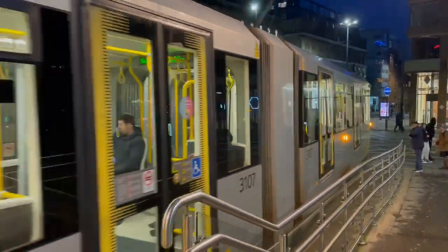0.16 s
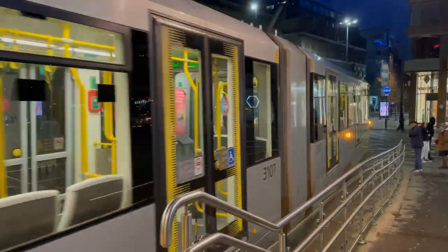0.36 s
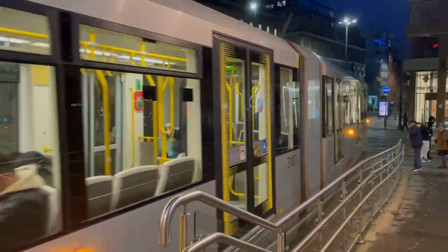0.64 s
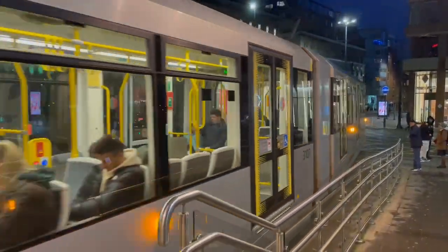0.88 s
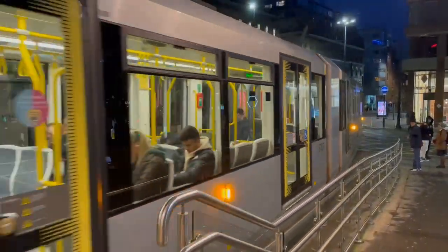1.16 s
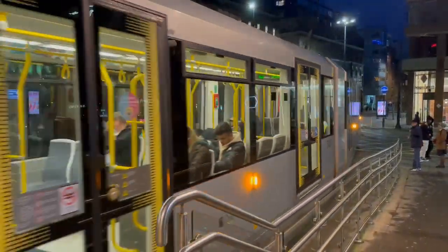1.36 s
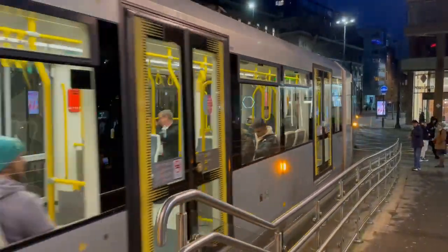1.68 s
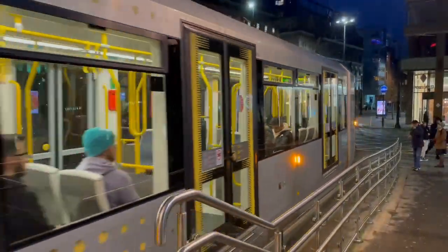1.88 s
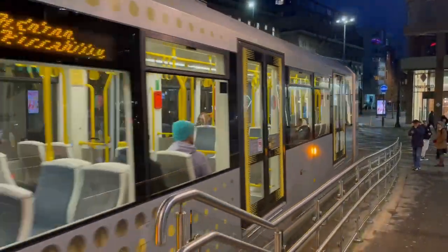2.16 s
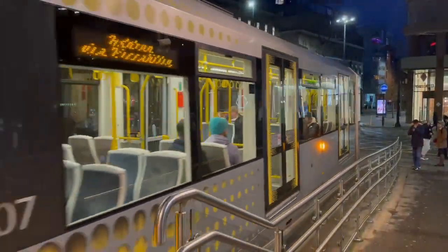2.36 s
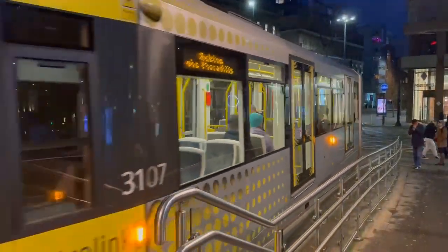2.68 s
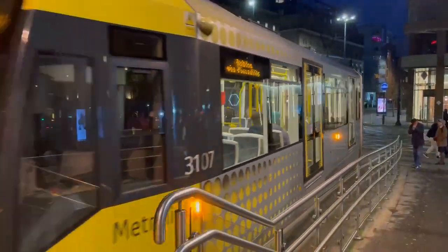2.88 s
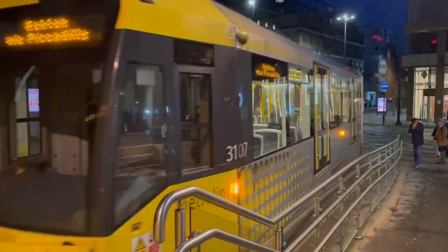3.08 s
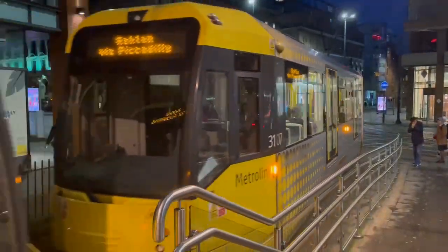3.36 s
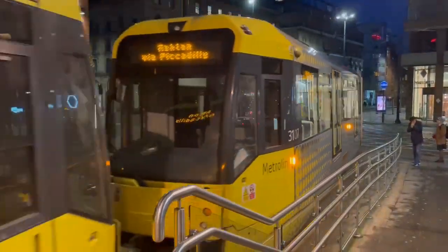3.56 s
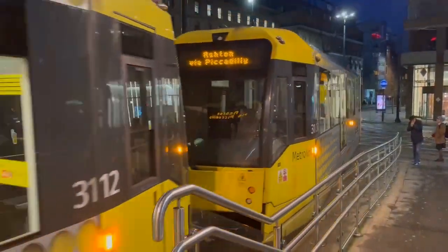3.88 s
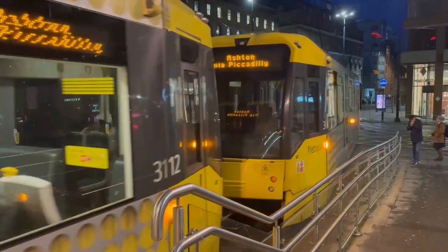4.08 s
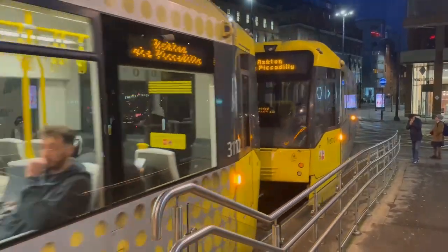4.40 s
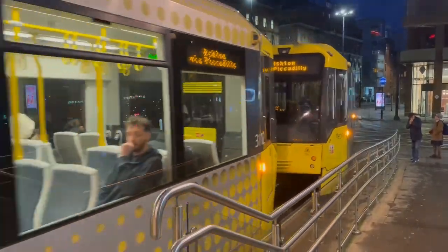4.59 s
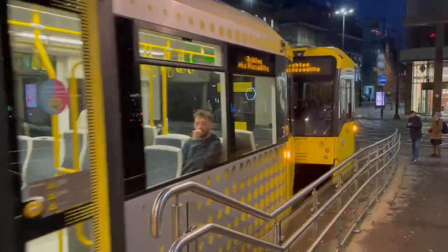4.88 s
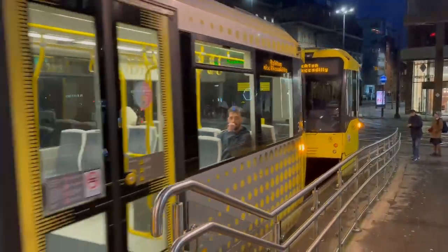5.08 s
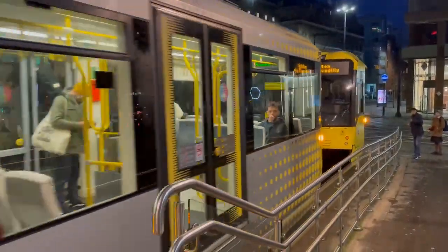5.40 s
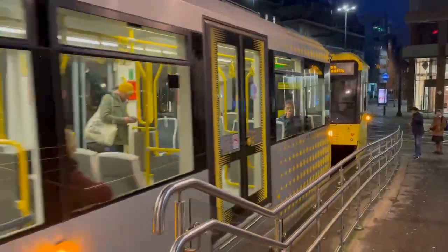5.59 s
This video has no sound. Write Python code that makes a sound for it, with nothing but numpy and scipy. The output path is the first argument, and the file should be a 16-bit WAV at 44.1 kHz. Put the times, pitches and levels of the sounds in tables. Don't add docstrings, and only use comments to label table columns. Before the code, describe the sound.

Close stereo phone capture beside a tram track at a city stop. A deep, uneven boom near seventy hertz dominates throughout, with a dull rolling roar on top. A faint gear whine fades during the first three seconds. Small metallic ticks and rattles come and go, then from about 4.3 seconds loose steel chatters densely, with short scrapes and high squeaks until the end. No voices.

```python
import sys
import numpy as np
from scipy import signal
from scipy.fft import rfft, irfft
from scipy.io import wavfile
from scipy.ndimage import uniform_filter1d, map_coordinates

SR = 44100
rng = np.random.default_rng(int(sys.argv[2]) if len(sys.argv) > 2 else 0)


def attenuation_scalar(level_db):
    decades = np.asarray(level_db, float) / 20
    return 10 ** decades


def wrap_up_sound(samples):
    columns = np.atleast_2d(samples).T
    tamed = np.clip(columns, -1, 1)
    steps = np.round(tamed * 32767).astype(np.int16)
    wavfile.write(sys.argv[1], SR, steps)


N = 253134
TIME = np.arange(N) / SR
HZ = np.maximum(np.arange(N // 2 + 1) * SR / N, 1)

# time_s, pitch_hz, level_db
BOOM = [(0, 63.88, -15.5), (.4, 67.84, -18), (.6, 77.12, -19.5), (.72, 69, -20.5), (.98, 76.09, -21),
        (1.12, 73.02, -11.5), (1.44, 63.95, -12), (1.9, 67.09, -13), (2.4, 66.86, -17.5),
        (2.5, 70.91, -15.5), (3.0, 70.68, -16.5), (3.7, 72.1, -14.5), (3.9, 74.78, -20.5), (4.3, 76.02, -9),
        (4.45, 72, -10), (4.76, 65.98, -16.5), (5.1, 70.77, -25.5), (5.74, 72.4, -13.5)]
# time_s, depth_db, half_length_s
LULLS = [(0.21, 11.5, 0.13), (0.516, 12, 0.046), (0.856, 3, 0.041), (1.045, 12, 0.041),
         (1.284, 11.5, 0.073), (1.71, 7, 0.069), (2.213, 17.5, 0.071), (3.1, 9.5, 0.13),
         (3.366, 15.5, 0.079), (3.611, 27, 0.067), (4.17, 3, 0.08), (4.371, 13, 0.068), (4.68, 4, 0.045),
         (5.067, 5, 0.076), (5.672, 12, 0.061)]


def boom_level_db():
    load_db = curves(BOOM)[1]
    return load_db - sum(depth_db * hump(s, half_s, half_s) for s, depth_db, half_s in LULLS)


def boom():
    hz = curves(BOOM)[0]
    swing = tone(hz, 2.476, 14) * attenuation_scalar(walk(18))
    rumble = attenuation_scalar(-10.5) * narrow(68.8, 18.4)
    return unit(swing + rumble) * attenuation_scalar(boom_level_db())


# time_s, gain_db
NEAR = [(0, 0), (1.0, 0.5), (1.45, 2), (1.7, 0.5), (2, 1), (2.3, -0.5), (3.4, 1), (4.05, -1), (4.3, 2),
        (4.6, 4), (4.85, 3.5), (5.05, 2), (5.3, 3.5), (5.6, 4.5), (5.74, 6)]


def near_db(per_db):
    return per_db * curves(NEAR)[0]


# pitch_hz, density_db_per_hz
ROLL_COLOUR = [(20, -38), (32, -34), (45, -14), (70, -9), (105, -14), (143, -21), (172, -23), (215, -23),
               (320, -29), (500, -31.5), (820, -28.5), (1190, -40), (1600, -41.5), (2400, -46),
               (3500, -49.5), (6500, -60.5)]
# pitch_hz, level_db
HISS_TOP = [(6500, 0), (7600, 2.5), (9000, -1), (11000, -7.5), (12500, -12.5), (13600, -13), (14200, -27),
            (15800, -38)]
# time_s, body_swell_db, rail_swell_db
BUMPS = [(0, 5.5, 0), (1.4, 1.5, 1.5), (1.65, 5.5, 1.5), (1.92, 3, 1.5), (2.41, 5.5, 2), (2.77, 2.5, -0.5),
         (4.24, 3, 3), (4.76, 3.5, 0.5), (5.04, 4, -1.5), (5.21, 5, 2), (5.28, -7, 0.5), (5.47, -5, 3),
         (5.74, 1.5, 7.5)]
BUMP_RISE_S, BUMP_FALL_S = 0.043, 0.1
BODY_PER_DB, RAIL_PER_DB, HISS_PER_DB = 0.85, 0.51, 0.92


def rolling():
    times, body_swells, rail_swells = np.transpose(BUMPS)
    bumps = [hump(s, BUMP_RISE_S, BUMP_FALL_S) for s in times]
    thud_db = 0.59 * uniform_filter1d(boom_level_db() + 17.5, int(.3 * SR))
    body_db = near_db(BODY_PER_DB) + np.dot(body_swells, bumps) - 2.05
    rail_db = near_db(RAIL_PER_DB) + np.dot(rail_swells, bumps) - 2.5
    hiss_db = near_db(HISS_PER_DB) - 0.9
    colour = ROLL_COLOUR + [(f, ROLL_COLOUR[-1][1] + d) for f, d in HISS_TOP[1:]]
    noise = rfft(rng.standard_normal((2, N))) * attenuation_scalar(over_hz(colour))
    shared_flutter = walk(12)
    octave = np.log2(HZ)
    roar = np.zeros((2, N))
    for centre in np.arange(4.5, 14.6, .5):
        band = np.cos(np.pi / 2 * np.clip((octave - centre) * 2, -1, 1)) ** 2
        if centre < 6.3:
            swell_db = thud_db
        elif centre < 8.3:
            swell_db = body_db
        elif centre < 10.4:
            swell_db = rail_db
        else:
            swell_db = hiss_db
        flutter_db = .9 * walk(9) + np.clip((centre - 8) / 4, 0, 1) * 1.2 * shared_flutter
        roar += irfft(noise * band, N) * attenuation_scalar(swell_db + flutter_db)
    return unit(roar) * attenuation_scalar(-22)


# pitch_hz, width_hz, port_lag_rad, [start_s, end_s, level_db]
SLAB_RINGS = [(102.6, 7.78, 0.16, [(2.5, 3.2, -34), (3.35, 3.47, -37), (3.58, 3.85, -37), (4.1, 4.4, -28),
              (4.75, 5.4, -34)]), (140.2, 9.78, 0.14, [(1.1, 1.35, -31.5), (1.42, 1.58, -29.5),
              (1.6, 1.72, -31.5), (1.8, 1.97, -30), (2.36, 2.66, -28), (2.7, 3.1, -33), (3.93, 4.08, -28.5),
              (4.14, 4.26, -28.5), (4.3, 4.6, -31.5), (5.1, 5.5, -28)]),
              (210.2, 10.72, 0.0064, [(0, .45, -36.5), (1.58, 1.72, -38.5), (3.98, 4.14, -35.5),
              (4.3, 4.4, -35), (4.55, 4.9, -39), (5.35, 5.5, -35), (5.52, 5.9, -27)]),
              (264.4, 9.3, 0.83, [(.82, 1.32, -35.5), (1.38, 1.5, -36), (1.75, 2.05, -41.5),
              (2.8, 3.05, -38.5), (3.44, 3.56, -39), (4.24, 4.36, -32.5)]), (354, 32.2, 0, [(.12, .24, -41),
              (2.85, 3.1, -41.5), (3.47, 3.62, -40.5), (4.4, 4.7, -46)]),
              (304.5, 14, 0.34, [(4.2, 4.37, -39.5), (5.23, 5.33, -43), (5.38, 5.45, -47)]),
              (350, 160, 0, [(5.62, 5.95, -44)])]
WHEEL_RINGS = [(470, 11.2, 2.3, [(3.9, 4.3, -41)]), (504, 17.1, 0.34, [(.12, .32, -45), (.72, .9, -45),
               (1.42, 1.55, -47), (2.42, 2.58, -44), (2.8, 3.05, -45), (4.17, 4.26, -43), (4.3, 4.4, -40.5),
               (4.43, 4.53, -39), (5.09, 5.19, -34.5), (5.22, 5.31, -29), (5.4, 5.45, -39),
               (5.64, 5.69, -34.5)]), (588, 5.6, 1.5, [(3.96, 4.1, -44), (4.14, 4.46, -35.5),
               (4.49, 4.74, -35), (4.74, 4.95, -35.5), (4.99, 5.1, -35.5)]),
               (537, 23, .3, [(3.23, 3.3, -45), (3.48, 3.55, -41)]), (774, 25, .2, [(2.1, 2.25, -48),
               (3.5, 3.57, -43), (3.77, 3.84, -39.5), (5.19, 5.26, -41)]), (703, 24.4, 0.41, [(0, .25, -49),
               (.3, .62, -45), (1.2, 1.35, -42.5), (1.38, 1.55, -43)]), (825, 30.1, .1, [(-.05, .1, -35),
               (.17, .45, -40.5), (.52, .7, -40.5), (1.38, 1.55, -42), (2.33, 2.5, -37.5),
               (3.62, 3.76, -42), (4.12, 4.25, -46), (4.44, 4.52, -39), (5.26, 5.34, -43),
               (5.36, 5.52, -37.5), (5.63, 5.9, -34.5)])]
RIM_RINGS = [(937, 41, .3, [(1.55, 2.05, -45), (2.5, 3.5, -47)]), (1390, 690, 0.45, [(5.62, 5.95, -34)]),
             (1600, 34.4, .8, [(.45, .8, -53), (.95, 1.1, -50), (1.2, 1.5, -52), (1.53, 1.62, -46),
             (1.74, 2.0, -50), (2.1, 2.28, -49), (2.4, 2.56, -51), (2.7, 2.85, -54)]),
             (1857, 30, 0, [(2.58, 2.66, -51), (4.28, 4.33, -48), (4.62, 4.85, -46)]),
             (2326, 45.5, 0, [(-.3, 2.8, -56), (.08, .18, -49), (.24, .4, -54), (.58, .66, -53),
             (.71, .83, -50), (.92, 1, -48.5), (1.15, 1.61, -52.5), (1.72, 1.86, -50), (1.89, 2.05, -56),
             (2.55, 2.7, -54), (2.85, 3.05, -49)]), (2490, 43.7, 0, [(.58, .68, -50), (.71, .82, -48),
             (.92, 1.02, -49), (1.26, 1.5, -54), (1.72, 2.05, -54)]), (2480, 44.7, 0, [(2.0, 2.08, -53),
             (2.24, 2.32, -51), (2.38, 2.56, -54)])]


def rings():
    out = 0
    for hz, width_hz, lag, swells in SLAB_RINGS + WHEEL_RINGS + RIM_RINGS:
        steady = tone(hz, width_hz / 3, 12) * np.clip(1.2 - width_hz / 60, 0, 1)
        shaken = np.clip(width_hz / 30, 0, .8) * narrow(hz, 1.5 * width_hz)
        ring = drift(steady + shaken, 0.00401, 8)
        late = np.roll(ring, int(lag * SR / (2 * np.pi * hz)))
        waver = attenuation_scalar(1.3 * walk(24.97))
        size = 0
        for start, end, level_db in swells:
            size = size + swell(start - .015, end + 0.013, 0.25 * (end - start)) * attenuation_scalar(level_db)
        out = out + np.array([ring, late]) * size * waver
    return out


# time_s, peak_db, fade_t60_s
JOLTS = [(.111, -39, .35), (.434, -33, 0.18), (.477, -36, .27), (.947, -42, 0.32), (1.19, -31.5, 0.55),
         (1.23, -38, 0.35), (1.485, -27.5, 0.3), (1.85, -32.5, 1.6), (2.579, -32, 0.74), (2.8, -34, 1.1),
         (3.002, -38, 0.28), (3.245, -35.5, 0.46), (3.465, -31, 1), (3.765, -33, 0.2), (4.003, -28.5, .3),
         (4.06, -36, 0.26), (4.19, -32, 0.61), (4.282, -24.5, 0.42), (4.385, -27, .35), (4.417, -22, 0.71),
         (4.444, -20.5, 0.91), (4.601, -19.5, 0.92), (4.659, -23, .35), (4.69, -22.5, 0.57),
         (4.775, -21.5, .4), (4.809, -22.5, 0.97), (4.875, -24.5, 0.68), (5.019, -32, .6),
         (5.11, -27.5, .5), (5.153, -28.5, 0.44), (5.2, -19.5, 0.23), (5.251, -25.5, 0.55),
         (5.313, -24, 0.93), (5.378, -23.5, 0.95), (5.483, -21, 0.85), (5.577, -22.5, 0.27),
         (5.691, -27, 0.38), (5.719, -25, .5)]
# pitch_hz, width_hz, level_db
PARTS = [(1570, 52, 0), (1860, 32, -10), (2200, 140, -2), (3160, 140, -1), (3666, 70, -2),
         (4540, 125, -2.5), (5110, 85, -2.5), (6020, 310, -9.5), (6580, 110, -7.5), (6960, 60, -12)]
# pitch_hz, level_db
SCRAPE = [(900, -34), (1800, -9.5), (4500, -6), (7000, -11), (10000, -17), (16000, -36.5)]
RATTLE_DB, RATTLE_PER_DB, JOLT_RISE_S = -53.5, 2, 0.0049


def rattle():
    idle_power = attenuation_scalar(RATTLE_DB + near_db(RATTLE_PER_DB)) ** 2
    power = idle_power + attenuation_scalar(-12.0) ** 2 * bursts(JOLTS, JOLT_RISE_S)
    shake = np.sqrt(power)
    scrape = rng.standard_normal((2, N)) * shake * attenuation_scalar(1.7 * walk(150))
    out = rfft(scrape) * attenuation_scalar(over_hz(SCRAPE))
    for hz, width_hz, level_db in PARTS:
        knocks = (rng.random((2, N)) < 900 / SR) * rng.standard_normal((2, N))
        share = attenuation_scalar(level_db - 2.5 + 3.5 * walk(18))
        resonance = 1 / (1 + 1j * (HZ - hz ** 2 / HZ) / (1.55 * width_hz))
        out += rfft(unit(knocks) * shake * share) * resonance
    return unit(irfft(out, N)) * np.sqrt(power.mean()) * attenuation_scalar(1)


# time_s, peak_db, fade_t60_s
SLIPS = [(1.155, -56.5, 0.33), (1.43, -71, 1.2), (1.98, -75, 1.5), (2.575, -55, 0.53), (2.685, -53, 1.5),
         (2.8, -53, 0.84), (3.19, -55, .3), (3.3, -62, .6), (3.355, -50.5, .25), (3.455, -52, 1.1),
         (3.75, -52, 0.43), (3.85, -50, 0.85), (3.995, -59, 0.65), (4.18, -56.5, 3.5), (4.52, -58, .8),
         (4.9, -57, 0.96), (5.2, -47, 0.18), (5.33, -51, 0.46), (5.55, -41, 0.39), (5.675, -54, 0.37),
         (5.725, -53, .4)]
# pitch_hz, width_hz, level_db
SQUEAK_MODES = [
    (9870, 130, 5),
    (13250, 160, -8),
    (8220, 60, -16),
    (15550, 300, -12),
    (14000, 900, -10),
]
# [start_s, end_s, level_db]
SCREECH = [(8600, 240, [(.08, .16, -57), (.68, .77, -53), (1.2, 1.28, -60), (4.762, 4.88, -33),
           (5.3, 5.4, -53)]), (14230, 60, [(4.772, 4.9, -58)]), (5230, 200, [(3.55, 3.63, -51),
           (4.22, 4.3, -52), (5.36, 5.46, -47)]), (3120, 260, [(4.43, 4.5, -40), (4.66, 4.72, -45),
           (5.28, 5.45, -47), (5.67, 5.72, -44)]), (1330, 90, [(5.07, 5.17, -46), (5.2, 5.235, -42),
           (5.29, 5.4, -45), (5.42, 5.47, -44)]), (5280, 300, [(1.46, 1.53, -47)]),
           (5080, 140, [(3.33, 3.4, -52), (3.46, 3.54, -52), (3.75, 3.8, -53), (3.84, 3.92, -54),
           (4, 4.1, -56), (4.6, 4.64, -46), (4.78, 4.86, -42), (4.88, 4.93, -45), (5.46, 5.54, -47)]),
           (3750, 450, [(4.29, 4.33, -45), (4.6, 4.76, -43), (5.19, 5.23, -45.5)]),
           (4545, 230, [(4.28, 4.36, -47), (4.41, 4.56, -40.5), (4.59, 4.64, -39), (4.66, 4.74, -39),
           (4.78, 4.93, -44), (5.0, 5.09, -44.5), (5.1, 5.125, -41), (5.15, 5.22, -42), (5.25, 5.35, -47),
           (5.68, 5.8, -47)]), (4150, 450, [(.425, .455, -49)]), (2250, 420, [(4.29, 4.34, -46),
           (4.65, 4.76, -42), (4.75, 4.89, -38.5), (4.88, 4.97, -42), (5.19, 5.22, -43), (5.46, 5.6, -46),
           (5.64, 5.8, -45)])]
SQUEAK_DB, SQUEAK_PER_DB, SLIP_RISE_S = -92, 3.5, 0.0081


def squeaks():
    idle_power = attenuation_scalar(SQUEAK_DB + near_db(SQUEAK_PER_DB)) ** 2
    slip = np.sqrt(idle_power + bursts(SLIPS, SLIP_RISE_S)) * attenuation_scalar(-2.5 + 1.5 * walk(40))
    out = slip * sum(attenuation_scalar(d) * drift(narrow(f, w), .0015, 10) for f, w, d in SQUEAK_MODES)
    for hz, width_hz, puffs in SCREECH:
        size = sum(attenuation_scalar(level_db) * swell(start, end + 0.008, 0.015) for start, end, level_db in puffs)
        out = out + drift(narrow(hz, width_hz), .004, 12) * size * attenuation_scalar(1.8 * walk(80))
    return out


# time_s, pitch_hz, level_db
WHINE = [(0, 1473, -42.5), (.12, 1421, -45), (.2, 1428, -44), (.33, 1440, -51), (.45, 1421, -44.5),
         (.66, 1460, -44), (.71, 1467, -45), (.78, 1488, -39.5), (.89, 1454, -51), (.94, 1445, -38),
         (1.04, 1461, -46), (1.1, 1463, -51), (1.17, 1472, -46), (1.21, 1475, -39.5), (1.4, 1470, -46.5),
         (1.62, 1450, -50), (1.8, 1480, -46), (2.2, 1486, -53.5), (2.45, 1486, -49), (2.9, 1493, -55)]
# pitch_ratio, level_db
WHINE_PARTS = [
    (1, 3.5),
    (1.03, -8),
    (.92, -7),
]
WHINE_LAG_RAD, WHINE_APART = 1.1, .45


def whine():
    hz, level_db = curves(WHINE)
    lag = int(WHINE_LAG_RAD * SR / (2 * np.pi * hz.mean()))

    def partial(ratio, part_db):
        return attenuation_scalar(part_db + .6 * walk(9) + 2.2 * walk(30)) * tone(ratio * hz, 19, 120)

    out = 0
    for ratio, part_db in WHINE_PARTS:
        near = partial(ratio, part_db)
        echo = WHINE_APART * partial(ratio, part_db)
        out = out + np.array([near + echo, np.roll(near, lag) - echo])
    return out * attenuation_scalar(level_db - 1.0) * swell(-1, 3.7, 0.62)


# time_s, pitch_hz, level_db
WHISTLES = [
    [(0, 15020, -55), (.6, 14950, -55), (1.2, 14890, -54), (2, 14865, -57), (3.5, 14845, -67),
     (5.8, 14845, -75)],
    [(0, 15130, -64), (1, 15110, -68), (3.5, 15110, -75), (4.3, 15085, -63), (5, 15015, -59),
     (5.8, 14945, -58)],
]


def whistles():
    haze_db = np.interp(TIME, [0, 2, 3.8, 5], [2, 0, -5, 1])
    out = attenuation_scalar(-60.0) * narrow(14990, 230) * attenuation_scalar(haze_db)
    for table in WHISTLES:
        hz, level_db = curves(table)
        out = out + tone(hz, 22, 70) * attenuation_scalar(level_db + 3 * walk(20))
    return out


# pitch_hz, lead_rad
PORT_LAG = [(0, -0.1), (860, -0.14), (1500, -1.2), (2410, -0.3), (3010, -0.32), (3900, 0.81), (5100, 0.48),
            (5940, 0.27), (6720, -0.26)]
# pitch_hz, lead_rad
TOP_LAG = [(7700, -np.pi), (8700, -3.3), (10800, -2 * np.pi), (12300, -2 * np.pi), (14000, -3 * np.pi),
           (22050, -3 * np.pi)]
# pitch_hz, likeness_0_to_1
LIKENESS = [(60, 1), (340, 0.84), (860, 0.49), (1400, 0.3), (2400, 0.5), (4000, 0.72), (5500, 0.4),
            (6500, 0.62), (7800, 0.98), (9600, 0.8), (11000, 0.86), (15000, 0.84)]
# pitch_hz, difference_db
PORT_TILT = [(60, -1), (200, -0.7), (500, 1.5), (1190, 0), (2160, -0.5), (3930, 4), (6500, 1.5), (7800, 2),
             (16000, -1.5)]


def ports(direct, scattered):
    like = np.clip(over_hz(LIKENESS), 0, 1)
    turn = np.exp(.5j * over_hz(PORT_LAG + TOP_LAG) * np.minimum(HZ / 700, 1))
    same = rfft(direct) * np.sqrt((1 + like) / 2)
    other = rfft(scattered) * np.sqrt((1 - like) / 2)
    tilt = attenuation_scalar(over_hz(PORT_TILT) / 2)
    return irfft([(same + other) * turn * tilt, (same - other) / turn / tilt], N)


def unit(x):
    return x / np.sqrt(np.mean(x ** 2))


def curves(table):
    s, *columns = np.transpose(table)
    return [np.interp(TIME, s, c) for c in columns]


def over_hz(table):
    f, value = np.transpose(table)
    return np.interp(np.log(HZ), np.log(np.maximum(f, 1)), value)


def walk(rate):
    k = int(SR / rate)
    held = np.repeat(rng.standard_normal(N // k + 1), k)
    return 1.304 * uniform_filter1d(uniform_filter1d(held, k), k)[:N]


def tone(hz, wobble_hz, rate):
    cycles = rng.random() + np.cumsum(hz + wobble_hz * walk(rate)) / SR
    return np.sqrt(2) * np.sin(2 * np.pi * cycles)


def narrow(hz, width_hz):
    mode = signal.iirpeak(hz, hz / width_hz, fs=SR)
    once = signal.lfilter(*mode, rng.standard_normal(N + SR))
    return unit(signal.lfilter(*mode, once)[SR:])


def drift(x, share, rate):
    wander = walk(rate)
    place = np.arange(N) + np.cumsum(share * (wander - wander.mean()))
    return map_coordinates(x, [place], order=3, mode="mirror")


def swell(start, end, edge_s):
    inside_s = np.minimum(TIME - start, end - TIME)
    return np.sin(np.pi / 2 * np.clip(inside_s / edge_s, 0, 1)) ** 2


def hump(s, rise_s, fall_s):
    return np.clip(np.minimum(1 + (TIME - s) / rise_s, 1 - (TIME - s) / fall_s), 0, 1)


def bursts(table, rise_s):
    power = 0
    for s, peak_db, t60 in table:
        t = np.maximum(TIME - s, 0)
        power = power + (attenuation_scalar(peak_db - 60 * t / t60) * np.minimum(t / rise_s, 1)) ** 2
    return power


def scene():
    singing = boom() + squeaks() + whistles()
    direct, scattered = rolling() + rattle()
    echo = .5 * np.roll(singing, 900)
    return ports(direct + singing, scattered + echo) + rings() + whine()


def top_cut(x):
    return signal.sosfilt(signal.butter(12, 15780, fs=SR, output="sos"), x)


def record(dry):
    return top_cut(dry)


dry = scene()
out = record(dry)
wrap_up_sound(out)
```